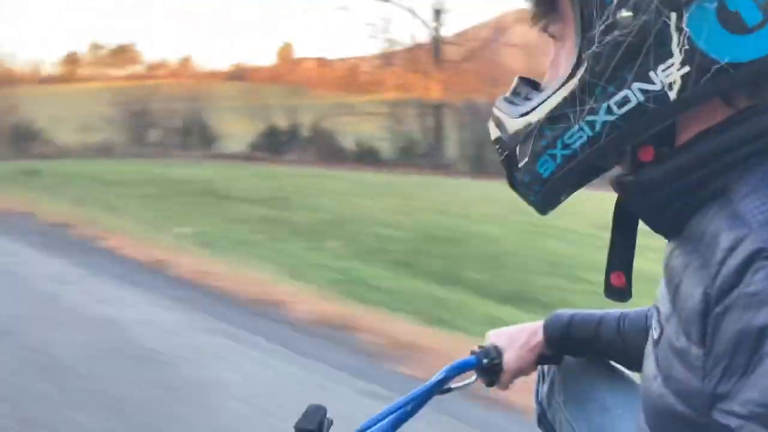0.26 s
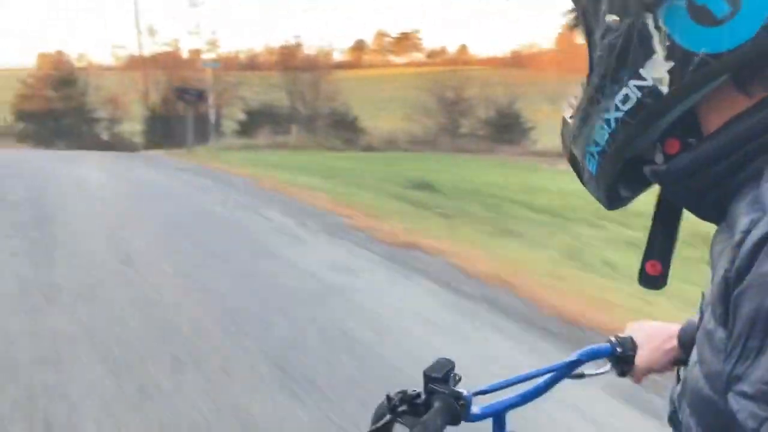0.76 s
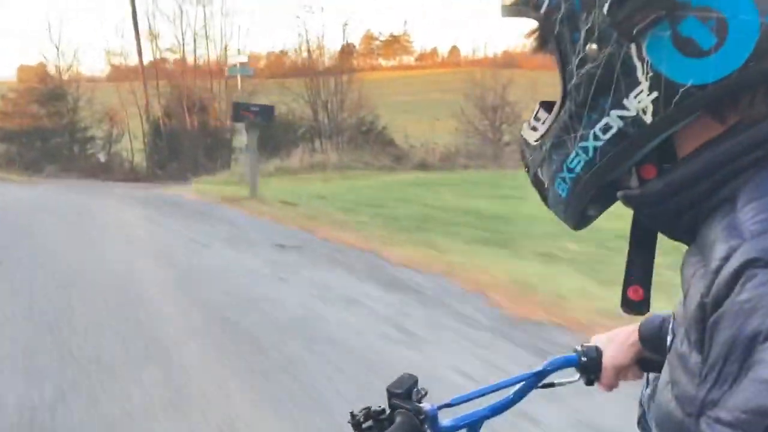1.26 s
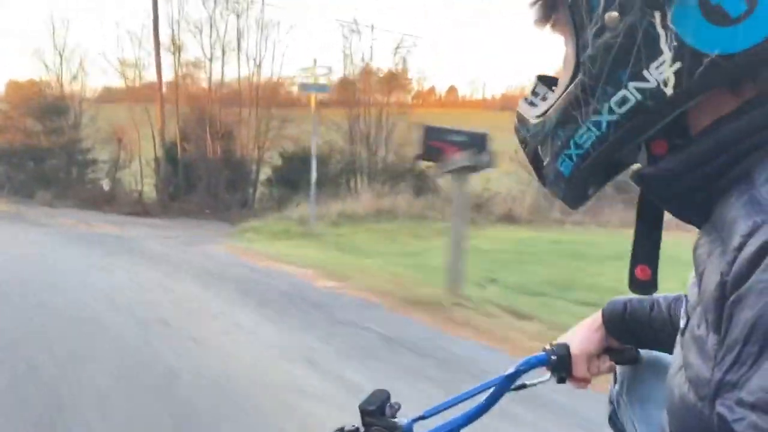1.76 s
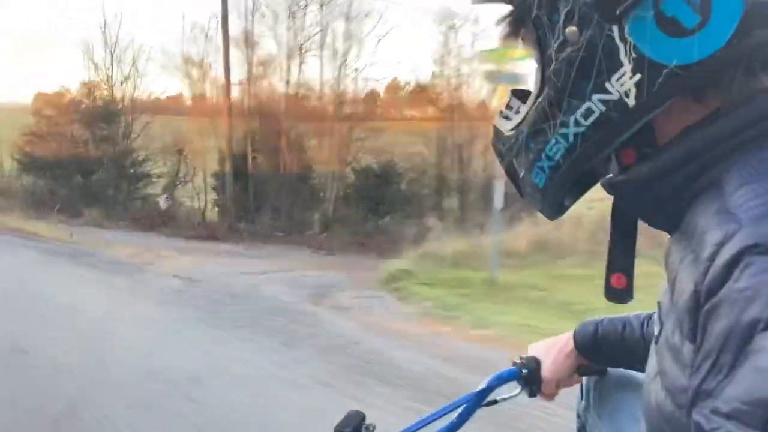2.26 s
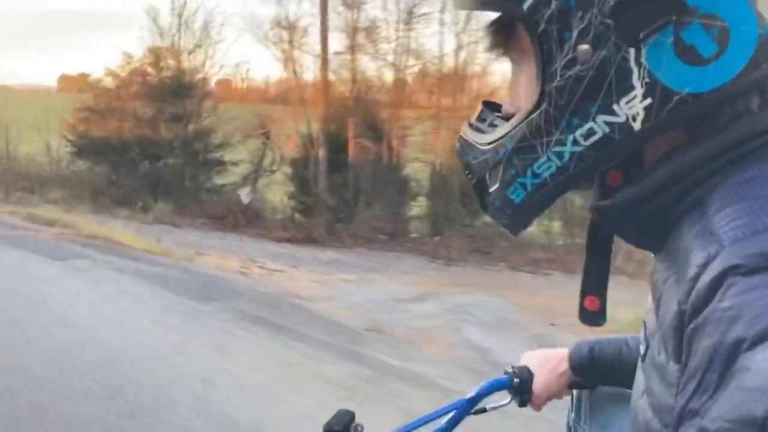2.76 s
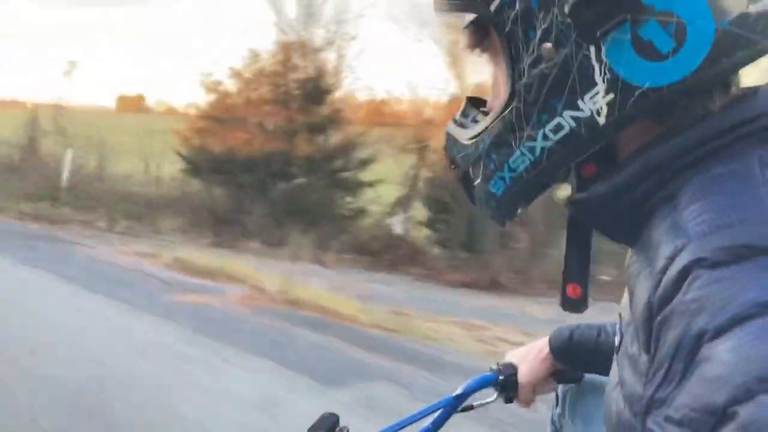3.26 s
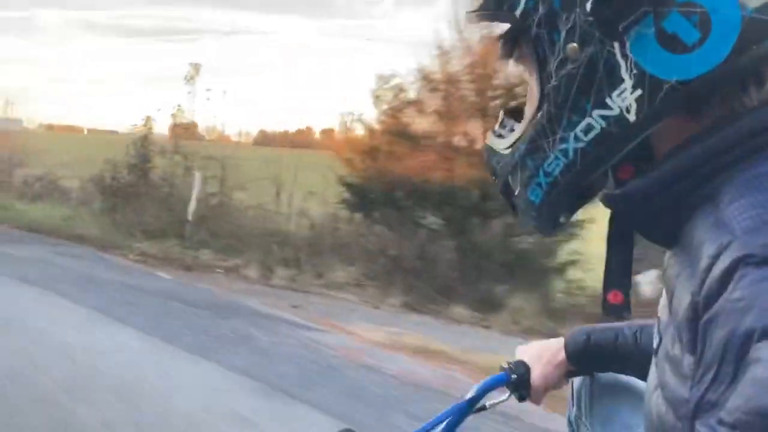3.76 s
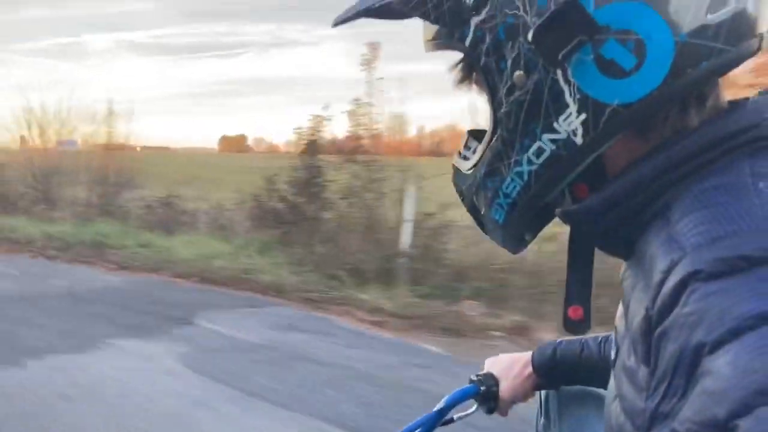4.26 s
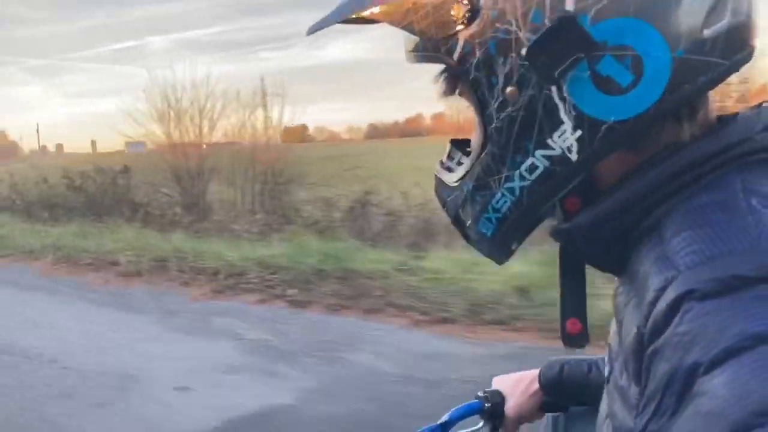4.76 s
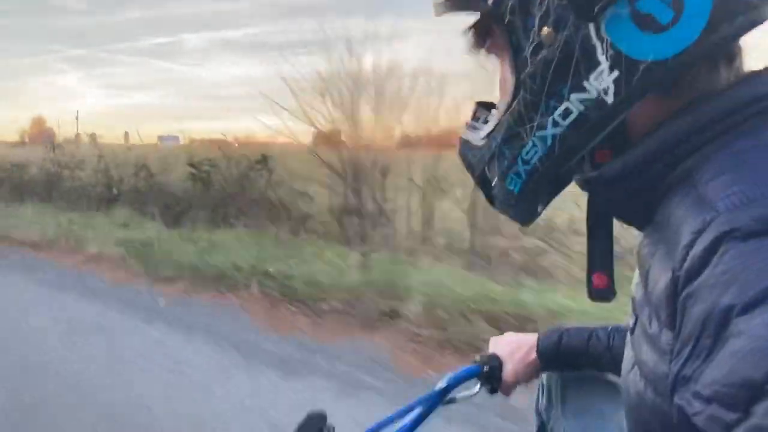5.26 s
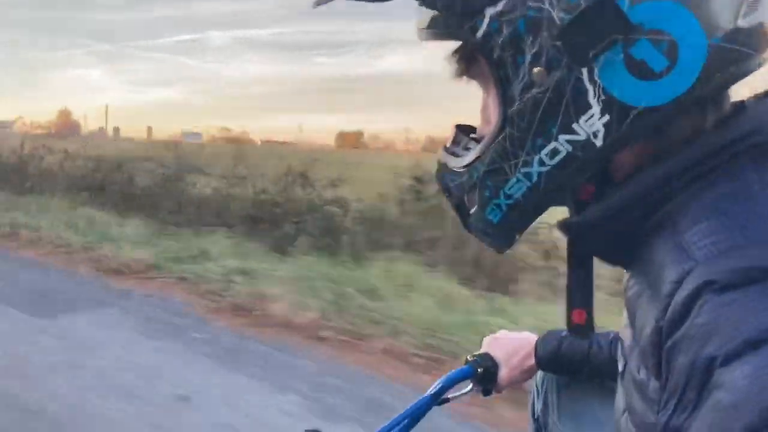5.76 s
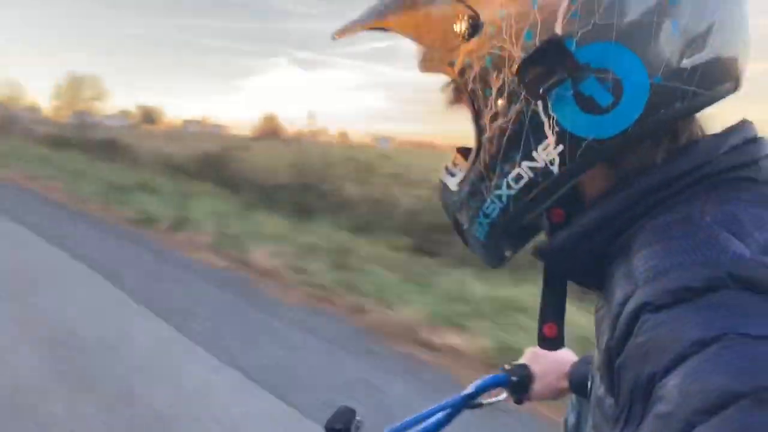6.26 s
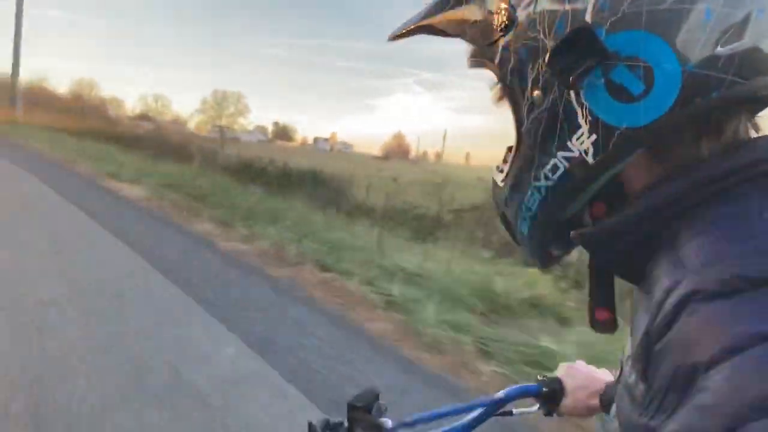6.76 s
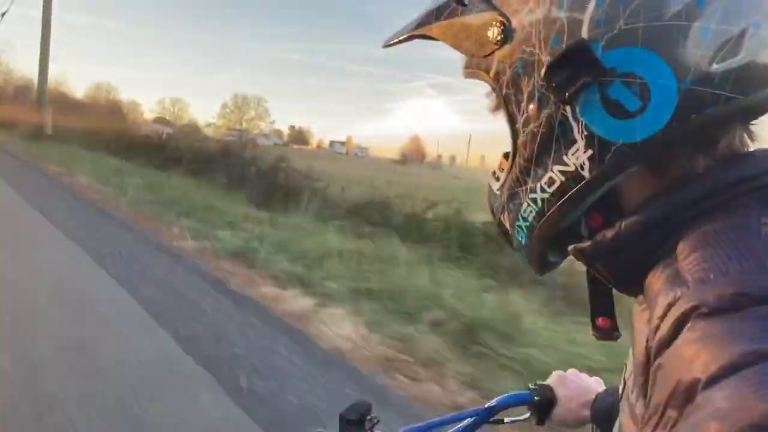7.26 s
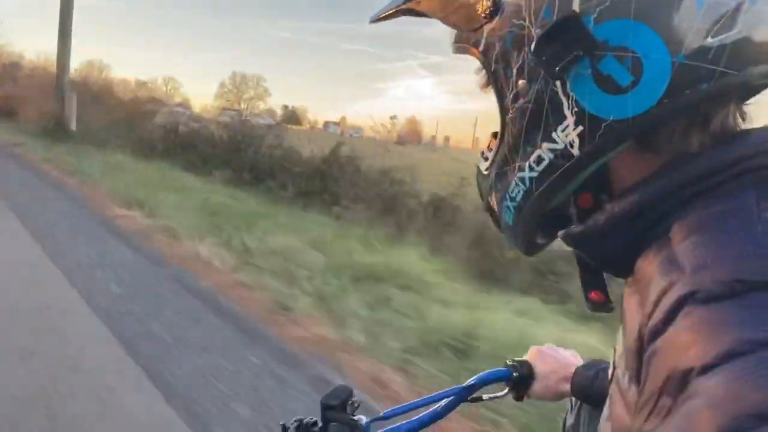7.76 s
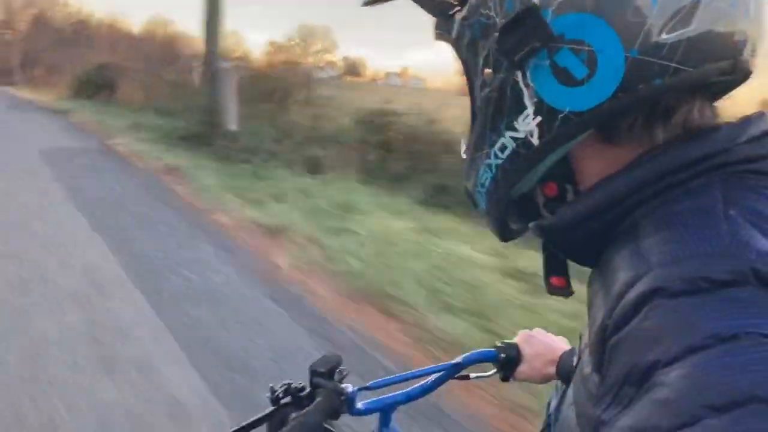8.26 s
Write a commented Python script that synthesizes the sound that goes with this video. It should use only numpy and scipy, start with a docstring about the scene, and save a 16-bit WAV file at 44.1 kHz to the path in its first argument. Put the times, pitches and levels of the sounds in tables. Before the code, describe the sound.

Outdoors on a road, a mini bike's single-cylinder engine is heard very close, from beside the rider. It begins at about 27 rapid pops a second, weak and faltering for the first third of a second, with a brief misfiring stutter to 0.6 s. The bark then grows louder, hollow and ringing, with gritty metallic cracks. Misfires with dull thuds on alternate strokes make it lurch around 1.3-2.5 s and again at 3.3-4 s. The pitch sags slowly to about 22 pops by 4.6 s, labouring harder and rougher with bassy, harsh cracks until nearly 5.9 s. The bark eases; at 6.2-6.6 s a few deep booms sound. From there the exhaust is shorter, cleaner and tighter, climbing smoothly to about 35 pops a second at 8.5 s. Throughout, patchy throbbing hiss and lumpy low wind lie beneath; a rough frame ring fades after 6.1 s.

```python
"""Mini bike under throttle

A one-cylinder engine is heard from beside the rider. Each exhaust stroke sends gliding tones down the pipe
(the bark) and a grainy burst of noise that shakes ringing metal (the crack). For stretches every other stroke
misfires with a late dull thud; later come a few deep booms, and the engine clears and climbs.
Beneath lie a rough ring of the frame, a throbbing, patchy hiss and a lumpy rumble of wind, all shaped noise."""
import sys
import numpy as np
from scipy import signal
from scipy.fft import rfft, irfft, next_fast_len
from scipy.io import wavfile
from scipy.ndimage import uniform_filter1d

SR = 44100
rng = np.random.default_rng(int(sys.argv[2]) if len(sys.argv) > 2 else 0)


def output_pcm(signal):
    """Save a mono or channel-first signal as 16-bit PCM at the path in sys.argv[1].

    Samples are clipped to [-1, 1] before scaling.
    """
    pcm = np.clip(np.atleast_2d(signal).T, -1, 1) * 32767
    wavfile.write(sys.argv[1], SR, np.round(pcm).astype(np.int16))


N = 374850

# engine speed: t/s, exhaust strokes per second
SPEED = [(0, 26.701), (.31, 27.557), (.67, 25.744), (1.29, 25.007), (2.45, 23.197), (3.13, 23.66),
         (3.65, 23.352), (4.56, 21.906), (5.46, 22.18), (6.1, 24.273), (7.23, 29.981), (7.8, 32.961),
         (8.5, 35.502)]
BEGUN = .158  # share of the first stroke already done at the start


def turns_done():
    """Counts the exhaust strokes done at every sample by adding up the engine speed."""
    return BEGUN + np.cumsum(curve(SPEED, np.arange(N) / SR)) / SR


# stretches where every other stroke does not fire: first t/s, last t/s, crack level/dB, thud level/dB
MISFIRING = [(.253, .253, -32, -15), (.362, .362, -26.5, -10), (.473, .636, -29, -12),
             (1.294, 1.864, -28, -12), (1.989, 2.499, -28.5, -10.5), (3.309, 3.4, -32, -15),
             (3.479, 4.0, -26, -9.5)]
# single strokes that falter or crack hard: t/s, bark change level/dB, crack change level/dB
UNEVEN = [(.07, 3.5, 0.5), (.105, -12, -5), (.143, -7.5, -1.5), (.18, -25, -10), (.29, -7.5, -11),
          (.325, -15, -26), (.435, -6, -7), (1.215, -1.5, -10), (1.254, -1, -15), (1.334, 1, 2),
          (1.497, -3.5, -7.5), (1.824, -4, -8.5), (1.906, 0, -1.5), (1.95, -11, -13), (2.116, -1, -2),
          (2.201, 1, -6), (2.543, 0, 0.5), (2.586, -20, -28), (2.757, -1.5, -4.5), (2.886, 0, 1.5),
          (3.013, -1, 1), (3.098, 0.5, 5.5), (3.183, -1, 4), (3.224, -5, -28), (3.267, -5, -13),
          (3.352, -0.5, -7.5), (3.779, 2, 2), (4.04, 1, 3.5), (4.085, -6, -17), (4.173, -1.5, -6.5),
          (4.263, 1, 3), (4.353, 0, 3), (4.397, -1.5, -3), (4.444, -0.5, 0.5), (4.625, -0.5, 3.5),
          (4.671, 0.5, 2.5), (4.716, 0, -1), (4.899, -1, -3.5), (5.035, 1.5, -2.5), (5.079, -1.5, -3),
          (5.124, 2, -3), (5.214, 1, -2.5), (5.306, -1, 1), (5.487, 0.5, 1.5), (5.706, -1, -1),
          (5.794, -0.5, -2.5), (6.045, 1.5, 1), (6.288, -2.5, 1.5), (6.483, 0, 4), (6.445, -3, 0.5),
          (6.709, -0.5, -1), (6.782, -1, 0), (6.816, -2, -1.5), (6.92, -1.5, 3.5), (7.029, -1, -1),
          (7.061, 0, 3.5), (7.13, 0, -2.5), (7.23, -1, 2.5), (7.299, 0.5, 1.5), (7.427, -1, -0.5),
          (7.525, -0.5, -1), (7.619, -1, 1.5), (7.68, 0, 2.5), (7.771, -0.5, 1.5), (7.804, -3, -1),
          (7.864, -1, 0), (7.924, 1, 4), (8.012, 0.5, 0.5), (8.045, 0, -3.5), (8.159, -0.5, -0.5),
          (8.248, -1, 0), (8.277, -1, 2), (8.306, -1, -2.5)]
# strokes that fire with a deep boom: t/s, level/dB
BOOMS = [(6.249, -5.5), (6.329, -4), (6.407, -6), (6.486, -4), (6.561, -4), (6.6, -9.5)]
LATE_S, LATE_SPREAD_S = 0.0065, 0.00043  # a misfire is heard this long after its stroke
MISS_CRACK_SPREAD_DB, THUD_SPREAD_DB = 0.5, 3
AFTER_MISS_BARK_DB, AFTER_MISS_CRACK_DB = -0.75, -3.95  # the stroke after a misfire is weaker


def strokes():
    """Decides when each stroke comes, how strong it is by chance, and whether it fires, booms or misfires."""
    done = turns_done()
    later = np.interp(np.arange(1, done[-1]), done, np.arange(N) / SR)
    at = np.r_[-BEGUN / SPEED[0][1], later]

    def nearest(s):
        return np.abs(at[:, None] - s).argmin(0)

    chance = rng.standard_normal((len(at), 6))
    bark_db, crack_db = .8 * chance[:, 0], 1.6 * chance[:, 1]
    first, last, miss_db, thud_db = np.transpose(MISFIRING)
    runs = [np.arange(a, b + 1, 2) for a, b in zip(nearest(first), nearest(last))]
    missed, sizes = np.concatenate(runs), [len(run) for run in runs]
    bark_db[missed + 1] += AFTER_MISS_BARK_DB
    crack_db[missed + 1] += AFTER_MISS_CRACK_DB
    s, *changes = np.transpose(UNEVEN)
    bark_db[nearest(s)], crack_db[nearest(s)] = changes  # these replace chance
    number = np.arange(len(at))
    cracks = ~np.isin(number, missed)
    barks = cracks & ~np.isin(number, nearest(np.transpose(BOOMS)[0]))
    late, crack_luck, thud_luck = chance[missed, 3:].T
    miss_at = at[missed] + LATE_S + LATE_SPREAD_S * late
    miss_crack_db = np.repeat(miss_db, sizes) + MISS_CRACK_SPREAD_DB * crack_luck
    miss_thud_db = np.repeat(thud_db, sizes) + THUD_SPREAD_DB * thud_luck
    at = at + .0001 * chance[:, 2]  # slightly uneven timing
    return at, bark_db, crack_db, barks, cracks, (miss_at, miss_crack_db, miss_thud_db)


# how hard the engine works: t/s, bark level/dB, bass over the bark level/dB, crack level/dB, hiss level/dB
THROTTLE = [(0, -26, -16, -34, -48), (.3, -14.5, 6, -29, -49), (.55, -11, -5, -24, -47.5),
            (.75, -15, -1, -29.5, -40.5), (1.1, -15, 6, -26.5, -40), (1.4, -9, -11, -22.5, -43),
            (1.8, -7.5, -4, -20, -41), (2.3, -9.5, -6, -20, -40), (3.1, -9, 0, -25.5, -40),
            (3.5, -8.5, -11, -19.5, -38.5), (4.3, -9, -3, -24.5, -40), (4.9, -8, -5, -19, -36.5),
            (5.5, -9.5, 6, -18, -38), (5.8, -9, 5, -15, -37.5), (5.87, -12.5, 7, -20, -42.5),
            (6.1, -15.5, 8, -17.5, -43.5), (6.25, -18, 0, -17, -42), (6.55, -18, 2.5, -18, -40.5),
            (6.9, -17, 1.5, -19, -44), (7.5, -15, -0.5, -19, -40), (8.5, -11.5, -1.5, -17, -38)]
# the engine clears: t/s, share of the short bark of clean running
CLEARING = [(6.1, 0), (6.24, 1)]
# waves in the pipe, in all tables down to BOOM: lag/ms, first f/Hz, last f/Hz (both before the pitch factor),
# glide/ms, rise/ms, fall/ms, level/dB over the stroke, push 1 or pull -1
# the long bark before the engine clears: bass, body and a lasting ring
LONG_BASS = [(4.94, 243, 30, 12, 20.3, 13, 4.2, 1), (11.52, 200, 255, 17.7, 22.3, 3.65, 12.5, 1)]
LONG_BARK = [(2.38, 547, 90, 4.88, 17, 16.4, 6.1, 1), (3.94, 994, 354, 7.08, 39, 16.5, -6.5, 1),
             (8.96, 229, 521, 19.7, 28.4, 7.87, 13.6, -1)]
LONG_RING = [(2.2, 511, 527, 14, 63, 11.4, 5.5, 1), (3, 419, 452, 15, 64, 14, -1.5, 1)]
# the short bark of clean running: bass and body
SHORT_BASS = [(14.06, 187, 57.4, 1, .7, 33.8, -13.7, -1), (5.7, 346, 31, 5.78, 13.5, 4.5, 17.1, 1)]
SHORT_BARK = [(7.18, 301, 365, 16.9, 2.1, 10.5, -5, -1), (2.13, 416, 333, 1.67, 3.1, 11.4, 2.7, 1)]
# a hum that leads the opening barks
EARLY_HUM = [(.7, 329, 365, 6.2, 10, 11.5, 5.8, -1), (4, 241, 224, 6.7, 2.6, 8.8, 5.7, 1)]
# how loud that hum is: t/s, level/dB over the bark
EARLY_HUM_LEVEL = [(0, 1.5), (.6, 0.5), (.75, 2.5), (1.1, -5), (1.4, -12)]
# the dull thud of a misfire
THUD = [(3.45, 139, 56.3, 12.8, 6.6, 17.4, 0, -1)]
# the deep boom
BOOM = [(1.53, 384, 46, 5.8, 6.6, 22, -1.9, -1), (0.96, 1350, 150, 1.8, 2.8, 2.5, -1.9, 1)]
# pipe pitch factor at 25 strokes a second, and its rise per extra stroke a second
PITCH_AT_25, LONG_RISE, SHORT_RISE = .93, .004, .009


def pipe(at, bark_db, barks, misfires):
    """Barks, thuds and booms are waves in the exhaust pipe; barks ring higher as the engine speeds up."""
    at, db = at[barks], (bark_db + curve(THROTTLE, at))[barks]
    bass_db = db + curve(THROTTLE, at, column=2)
    short = np.clip(curve(CLEARING, at), 1e-4, 1 - 1e-4)
    short_db, long_db = 20 * np.log10(short), 20 * np.log10(1 - short)
    waver = 1 + .005 * rng.standard_normal(len(at))
    faster = curve(SPEED, at) - 25
    pitch = (PITCH_AT_25 + LONG_RISE * faster) * waver
    high_pitch = (PITCH_AT_25 + SHORT_RISE * faster) * waver
    out = waves(at, db + long_db, LONG_BARK, pitch)
    out += waves(at, db + long_db, LONG_RING, high_pitch)
    out += waves(at, bass_db + long_db, LONG_BASS, pitch)
    out += waves(at, db + short_db, SHORT_BARK, high_pitch)
    out += waves(at, bass_db + short_db, SHORT_BASS, high_pitch)
    early = at < 1.4
    hum_db = db + curve(EARLY_HUM_LEVEL, at)
    out += waves(at[early], hum_db[early], EARLY_HUM, PITCH_AT_25)
    miss_at, _, thud_db = misfires
    return out + waves(miss_at, thud_db, THUD) + waves(*np.transpose(BOOMS), BOOM)


def waves(s, db, rows, pitch=1):
    """Plays gliding tones after each stroke, as the puff runs to and fro in the pipe."""
    heard = db > -60
    s, db, pitch = s[heard], db[heard], (pitch * np.ones(len(s)))[heard]
    lead, length = 1000, 2400  # samples: spare room before the start, and one wave
    out = np.zeros(N + 4000)
    places = np.round(s * SR).astype(int)[:, None] + lead + np.arange(length)
    fade_out = np.minimum(np.arange(length)[::-1] / 300, 1)
    for lag, first_hz, last_hz, glide, rise, fall, wave_db, sign in rows:
        ms = np.maximum(np.arange(length) * 1000 / SR - lag, 0)
        turns = (last_hz * ms + (first_hz - last_hz) * glide * (1 - np.exp(-ms / glide))) / 1000
        shape = np.sign(sign) * (1 - np.exp(-ms / rise)) * np.exp(-(ms / fall) ** 2) * fade_out
        each = gain_of(db + wave_db + .4 * rng.standard_normal(len(s)))[:, None]
        tones = each * shape * np.sin(2 * np.pi * turns * pitch[:, None])
        out += np.bincount(places.ravel(), tones.ravel(), len(out))
    return out[lead:N + lead]


# colour of the crack: f/Hz, level/dB
CRACK = [(500, 2.5), (800, 1), (1200, -2), (1800, 7), (3500, 4), (4300, 16.5), (6000, 13.5), (8500, 15),
         (12000, 9), (16000, 8)]
# likeness of the crack at the two microphone openings: f/Hz, share
CRACK_ALIKE = [(100, .5), (1000, .6), (1400, .8), (2300, .8), (3000, .6), (3700, .65), (4600, .95),
               (5200, .98), (6700, .98), (8500, .85), (12000, .96), (14200, .94), (16000, .6)]
# parts of the crack, each with its own luck per stroke:
# from f/Hz, to f/Hz, rise/ms, fall/ms, spread level/dB, second puff level/dB
PUFFS = [(0, 1800, 2.6, 3, 3.5, -5), (1800, 3000, 2.5, 2.6, 5, -4), (3000, 4200, 2.7, 2.6, 5, -3),
         (4200, 5500, 2.1, 2.3, 4, -7), (5500, 9500, 1.2, 2.1, 3, -11), (9500, 22050, .9, 2.1, 3, -15)]
# change of each part once the engine runs clean: level/dB
PUFFS_CLEAN_DB = [-3, 3.5, -3, -1.5, 0.2, 1]
# change of each part on a misfire: level/dB
PUFFS_MISS_DB = [-22, -1.5, -1, -19.5, -5.5, -5]
# sheet metal the crack shakes: f/Hz, width f/Hz, level/dB from one ring to another
RINGS = [(1452, 84, 9), (1870, 86, 4.5), (2294, 81, 9.5), (3190, 190, 5.5), (3630, 150, 4), (3985, 320, 10)]
RINGS_CLEAN_DB = -2.5  # change of the first knock once the engine runs clean


def crack(at, crack_db, misfires):
    """Gas rushes out as the valve opens: grainy noise, a second puff while labouring, ringing metal."""
    early_ms = 6  # a burst swells before its peak
    ms = np.arange(1500) * 1000 / SR - early_ms

    def burst(peak, rise=3, fall=2.8):
        return np.exp(np.minimum((ms - peak) / rise, -(ms - peak) / fall))

    miss_at, miss_db, _ = misfires
    missed = np.r_[0 * at, 1 + 0 * miss_at]
    clean = curve(CLEARING, np.r_[at, miss_at])
    db = np.r_[crack_db + curve(THROTTLE, at, column=3), miss_db]
    at = np.r_[at, miss_at] - early_ms / 1000
    grain = gain_of(1.05 * evened(uniform_filter1d(rng.standard_normal(N), 25)))
    gas = pair(CRACK_ALIKE) * grain
    second = play(at, db, burst(7)) * (1 - .85 * curve(CLEARING, np.arange(N) / SR))

    hz, parts = np.fft.rfftfreq(N, 1 / SR), 0
    chance = rng.standard_normal((len(at), len(PUFFS)))
    for puff, clean_db, missed_db, luck in zip(PUFFS, PUFFS_CLEAN_DB, PUFFS_MISS_DB, chance.T):
        lo, hi, rise, fall, spread_db, second_db = puff
        luck_db = spread_db * np.clip(luck, -3, 1.5)
        first = play(at, db + clean_db * clean + missed_db * missed + luck_db, burst(0, rise, fall))
        band = 1 / (1 + (hz / hi) ** 8) - (lo > 0) / (1 + (hz / max(lo, 1)) ** 8)
        parts = parts + rfft(gas * (first + gain_of(second_db) * second)) * band
    out = colour(irfft(parts, N), CRACK)

    t = np.arange(800) / SR
    chance = rng.standard_normal((len(at), len(RINGS)))  # each stroke shakes other panels
    for (ring_hz, width, ring_db), luck in zip(RINGS, chance.T):
        ring = np.exp(-np.pi * width * t) * np.sin(2 * np.pi * ring_hz * t)
        ring = ring[None] / np.linalg.norm(ring)
        first = play(at, db + RINGS_CLEAN_DB * clean + 6 * np.clip(luck, -3, 1.5), burst(0))
        knock = gas * (first + gain_of(-3) * second)
        out += gain_of(ring_db - 19) * signal.oaconvolve(knock, ring, axes=1)[:, :N]
    return out


# a rough ring of the frame: t/s, f/Hz, level/dB
RASP = [(0, 930, -46.5), (1.4, 846, -43.5), (1.7, 886, -42.5), (2.3, 850, -41), (2.8, 905, -36),
        (4.2, 913, -38), (5.6, 898, -37.5), (6.05, 927, -35), (6.2, 960, -47)]
RASP_WIDTH_HZ, RASP_SWELL_DB, RASP_LAG = 134, 9, 0.2  # the swell peaks this share of a stroke late
RASP_TOP_HZ, RASP_TOP_WIDTH_HZ, RASP_TOP_DB = 973, 69, -4.5  # narrower ring at a steady pitch, until clear


def rasp():
    """The frame rings roughly: noise swells after each stroke in a drifting and a fixed resonance."""
    t = np.arange(N) / SR
    drive = pair() * gain_of(RASP_SWELL_DB * np.cos(2 * np.pi * (turns_done() - RASP_LAG)))
    drifting = resonate(drive, curve(RASP, t), RASP_WIDTH_HZ)
    top = resonate(drive, RASP_TOP_HZ, RASP_TOP_WIDTH_HZ)
    rings = drifting + gain_of(RASP_TOP_DB) * (1 - curve(CLEARING, t)) * top
    return gain_of(curve(RASP, t, column=2)) * rings


def resonate(drive, hz, width):
    """Lets through a narrow band that follows hz: shift it down to zero, smooth it twice, shift it back."""
    turn = np.exp(2j * np.pi * np.cumsum(hz * np.ones(N)) / SR)
    r = np.exp(-np.pi * width / SR)
    smooth = signal.lfilter([1 - r], [1, -r], drive / turn)
    smooth = signal.lfilter([1 - r], [1, -r], smooth)
    return evened((smooth * turn).real)


# colour of the hiss, lower part: f/Hz, level/dB
HISS = [(100, 6), (200, 2), (330, 15.5), (600, 7.5), (1000, -4)]
# colour of the hiss, upper part: f/Hz, level/dB
HISS_TOP = [(1500, -2), (2500, -4.5), (3700, -2), (4800, 0), (5800, 4.5), (7500, 3), (9000, .5), (12000, 0),
            (16000, -3)]
MISS_HISS_DB = -0.5  # the hiss sags over a misfire
HISS_THINS_DB = -6.5  # the hiss below 8 kHz drops as the engine clears


def hiss(misfires):
    """Rush of air and mechanical noise that throbs twice a stroke, flickers and sags over a misfire."""
    t = np.arange(N) / SR
    throb = np.cos(2 * np.pi * (2 * turns_done() - .1))
    flicker = evened(uniform_filter1d(uniform_filter1d(rng.standard_normal(N), 300), 300))
    miss_at = misfires[0]
    sag_db = MISS_HISS_DB * play(miss_at - .01, 0 * miss_at, np.hanning(3000))
    level_db = curve(THROTTLE, t, column=4) + sag_db + .5 * throb + 1.8 * flicker
    rush = colour(pair() * gain_of(level_db), HISS + HISS_TOP)
    below = signal.sosfiltfilt(signal.butter(4, 8000, fs=SR, output="sos"), rush)
    return rush + below * (gain_of(HISS_THINS_DB * curve(CLEARING, t)) - 1)


PATCH_DB = 4.5  # depth of the patches


def patchy(x):
    """The hiss grows louder and softer in random patches of time and pitch, between bass and treble."""
    hz, _, z = signal.stft(x, SR, nperseg=256)
    patches = rng.standard_normal(z.shape[:0:-1]).T
    patches = uniform_filter1d(patches, size=3, axis=0)  # spread over pitch
    patches = evened(uniform_filter1d(patches, size=8, axis=1))  # and over time
    middle = (hz > 700) / (1 + (hz / 6000) ** 4)
    gain = gain_of(PATCH_DB * np.minimum(patches, 1.4) * middle[:, None])
    return signal.istft(z * gain, SR, nperseg=256)[1][:, :N]


# strength of the wind: t/s, level/dB
GUSTS = [(0, -47.5), (1.8, -51.5), (4.3, -53), (5, -56), (5.6, -50), (5.9, -50), (6.2, -58.5), (8.5, -49.5)]
# colour of the wind: f/Hz, level/dB
WIND = [(15, -20), (30, -37), (55, 1), (100, 6.5), (200, -2), (400, -18.5)]


def wind():
    """Wind rumbles at the microphone: low noise that swells and sinks in random lumps."""
    lumps = evened(uniform_filter1d(uniform_filter1d(rng.standard_normal(N), 2500), 2500))
    level = gain_of(curve(GUSTS, np.arange(N) / SR) + 3.5 * lumps)
    return level * colour(pair(), WIND, 25, 64.7)


# likeness of the steady noises in the two channels: f/Hz, share
NOISE_ALIKE = [(100, .5), (1000, .55), (1800, .4), (2900, .2), (3700, .3), (4500, .9), (5000, .995),
               (7000, .995), (7800, .8), (8800, .4), (10300, .85), (12000, .98), (14200, .97), (16000, .6)]


def pair(likeness=NOISE_ALIKE):
    """Makes two channels of white noise, alike by a share that depends on frequency."""
    a, b = rfft(rng.standard_normal((2, N)))
    same = curve(likeness, np.fft.rfftfreq(N, 1 / SR))
    return irfft(np.array([same * a + np.sqrt(1 - same ** 2) * b, a]), N)


def colour(x, points, lo_hz=10000, hi_hz=15000):
    """Shapes a spectrum; white noise of rms 1 comes out with rms 1 in the band lo_hz to hi_hz."""
    hz, (f, db) = np.fft.rfftfreq(N, 1 / SR), np.transpose(points)
    shape = gain_of(np.interp(np.log(hz + 1), np.log(f), db))
    band = (hz > lo_hz) & (hz < hi_hz)
    return irfft(rfft(x) * shape / np.sqrt(np.sum(shape[band] ** 2) / len(hz)), N)


def play(s, db, shape):
    """Starts a shape at each time with its level."""
    clicks, at = np.zeros(N), np.round(np.asarray(s) * SR).astype(int)
    inside = (at >= 0) & (at < N)
    np.add.at(clicks, at[inside], gain_of(db)[inside])
    return signal.oaconvolve(clicks, shape)[:N]


def gain_of(db):
    """Turns decibels into a factor."""
    return 10 ** (np.asarray(db) / 20)


def evened(x):
    """Scales a signal to rms 1."""
    return x / np.sqrt(np.mean(x ** 2) + 1e-20)


def curve(points, t, column=1):
    """Reads a table at t, with straight lines between its rows."""
    rows = np.array(points)
    return np.interp(t, rows[:, 0], rows[:, column])


def scene():
    """Adds the engine, its ringing frame, its patchy hiss and the wind."""
    at, bark_db, crack_db, barks, cracks, misfires = strokes()
    engine = pipe(at, bark_db, barks, misfires) + crack(at[cracks], crack_db[cracks], misfires)
    return engine + rasp() + patchy(hiss(misfires)) + wind()


# left over right while the bass is wide: f/Hz, level/dB
LEFT_WIDE = [(100, -1.5), (300, -.4), (2000, 0)]
# left leads right while the bass is wide: f/Hz, phase/radians
LEAD_WIDE = [(0, 0), (90, 1.3), (170, 1.9), (260, 3.6), (520, 6.0), (690, 9.2), (950, 11.2), (1120, 9.4),
             (1300, 10.0), (2070, 8.8), (2600, 9.0), (3100, 7.9), (3600, 4.7)]
# left leads right once the bass is mono: f/Hz, phase/radians
LEAD_MONO_BASS = [(0, 0), (1130, 0), (1330, 3.1), (3100, 3.1), (3600, 3.6)]
# left leads right in the treble, throughout: f/Hz, phase/radians
LEAD_TREBLE = [(4100, 3.8), (4700, 3.2), (5200, 3.14), (6900, 3.14), (7750, 2.7), (9300, 1.6), (10900, .1),
               (14500, 0), (16000, -.7)]
# the recorder narrows its bass to mono: t/s, share
BASS_TO_MONO = [(5.49, 0.057), (5.54, 1)]
EDGE_HZ = 15900  # nearly nothing is heard above this


def record(dry):
    """Two openings give the left channel a phase lead by frequency; the bass lead ends as it goes mono."""
    size = next_fast_len(N + 4096)
    hz, left = np.fft.rfftfreq(size, 1 / SR), rfft(dry[0], size)
    wide_lead = np.exp(1j * curve(LEAD_WIDE + LEAD_TREBLE, hz))
    narrow_lead = np.exp(1j * curve(LEAD_MONO_BASS + LEAD_TREBLE, hz))
    wide = irfft(left * gain_of(curve(LEFT_WIDE, hz)) * wide_lead, size)[:N]
    narrow = irfft(left * narrow_lead, size)[:N]
    share = curve(BASS_TO_MONO, np.arange(N) / SR)
    low_pass = signal.butter(4, 1100, fs=SR, output="sos")
    bass = signal.sosfiltfilt(low_pass, dry[0] - dry[1]) / 2  # what sets the two basses apart
    both = np.array([(1 - share) * wide + share * (narrow - bass), dry[1] + share * bass])
    both = .95 * np.tanh(both / .95)  # the loudest cracks are softly clipped
    edge = signal.firwin(201, EDGE_HZ, window=("kaiser", 11), fs=SR)
    return signal.oaconvolve(both, edge[None], "same")


dry = scene()
out = record(dry)
output_pcm(out)
```